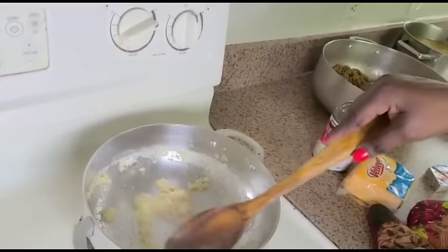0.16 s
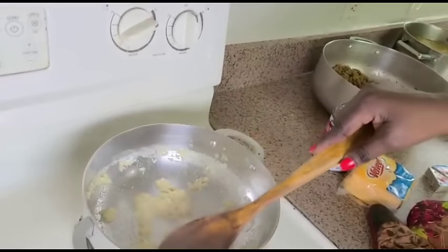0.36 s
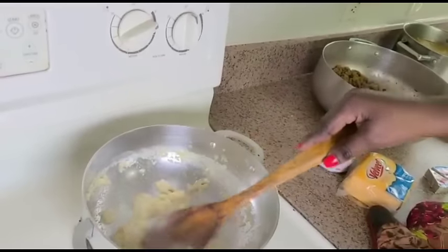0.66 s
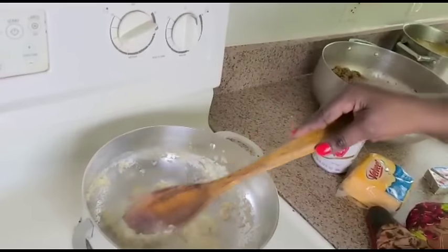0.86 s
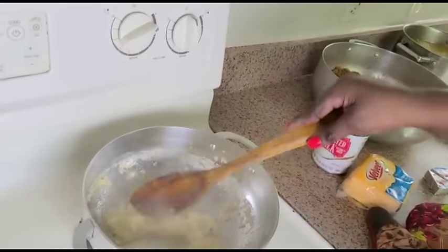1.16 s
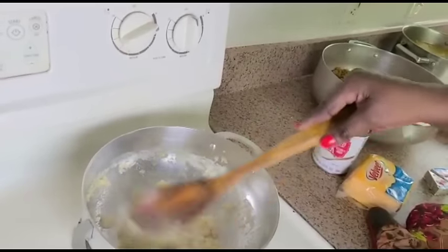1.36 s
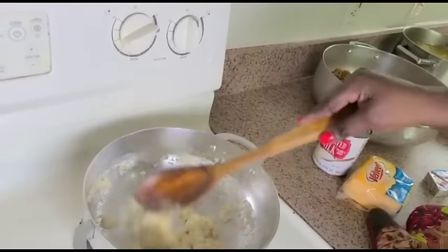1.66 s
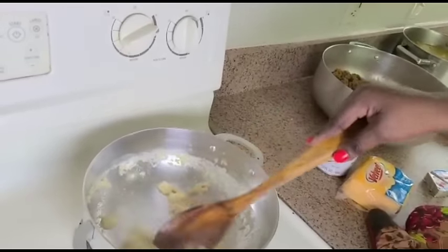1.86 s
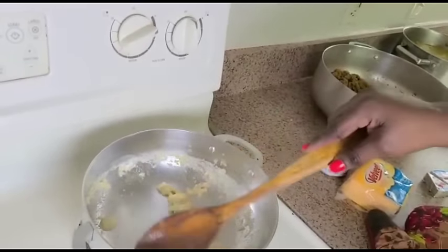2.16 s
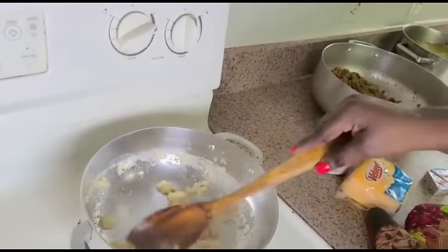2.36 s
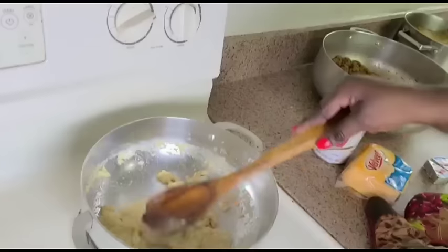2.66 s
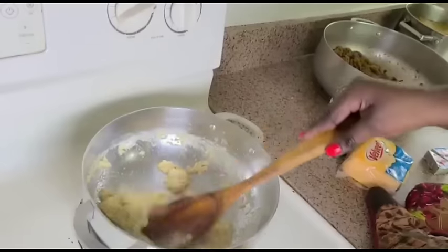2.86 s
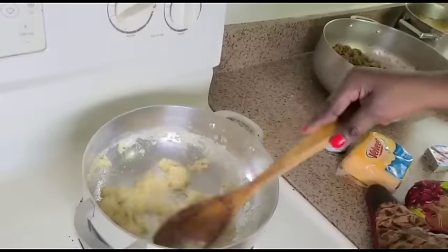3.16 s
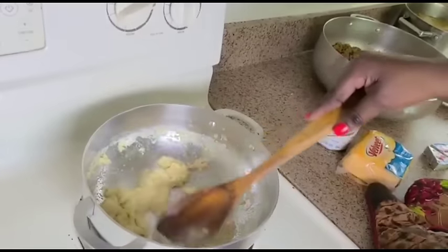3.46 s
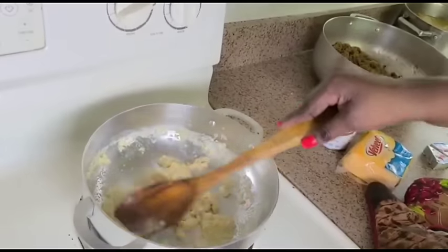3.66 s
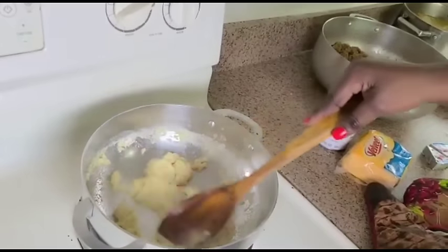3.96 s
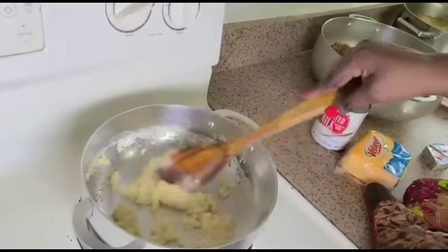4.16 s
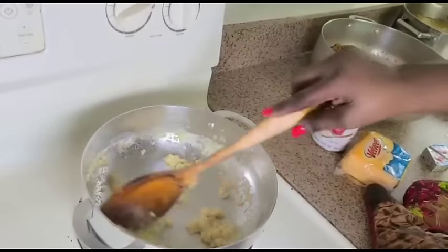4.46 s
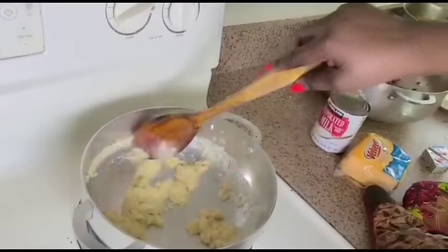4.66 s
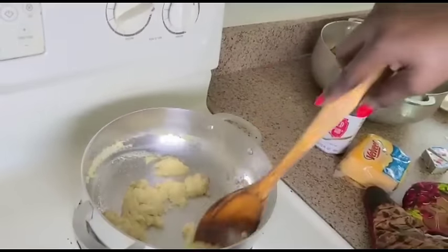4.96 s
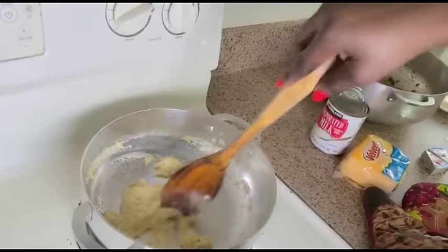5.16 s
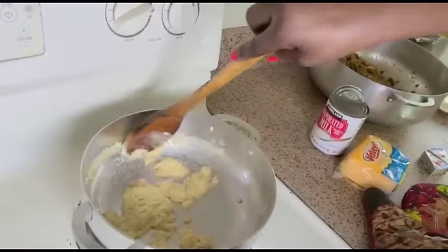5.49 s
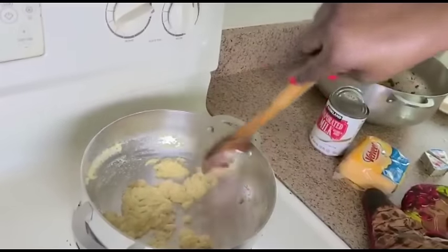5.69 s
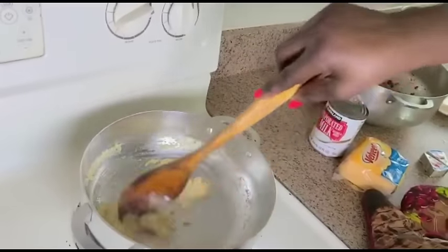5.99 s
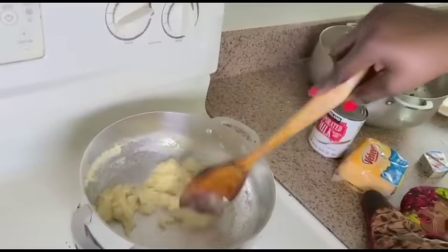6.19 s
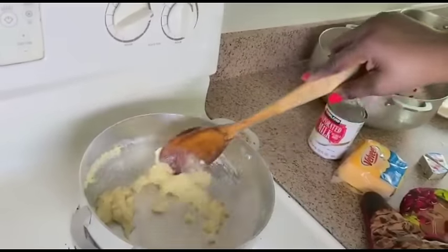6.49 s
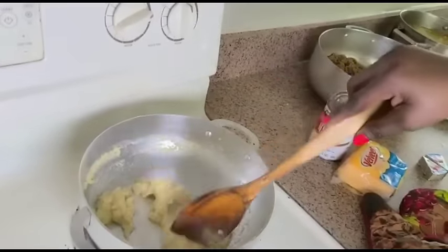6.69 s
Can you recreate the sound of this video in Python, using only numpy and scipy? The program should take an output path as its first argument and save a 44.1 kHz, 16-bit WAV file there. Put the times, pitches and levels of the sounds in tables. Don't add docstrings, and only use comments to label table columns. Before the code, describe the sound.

A wooden spoon knocks and scrapes unevenly around a thin metal pot while fat sizzles softly and a low appliance hum rumbles underneath.

```python
import sys
import numpy as np
from scipy import signal
from scipy.fft import rfft, irfft, next_fast_len
from scipy.io import wavfile

SR = 44100
rng = np.random.default_rng(int(sys.argv[2]) if len(sys.argv) > 2 else 0)


def unload_wav(signal):
    wavfile.write(
        sys.argv[1],
        SR,
        np.round(np.clip(np.atleast_2d(signal).T, -1, 1) * 32767).astype(np.int16),
    )


def natural_amplitude(level_db):
    exponent = np.asarray(level_db, float) / 20
    return 10 ** exponent


N = 301203
PADDED = next_fast_len(N)


def scene():
    struck = bottom_blows() + wall_blows() + corner_blows() + burner_jolts()
    return struck + natural_amplitude(-21) * kitchen(struck) + dragging() + frying() + rumble()


# mode_hz, level_db, t60_s
STOVE_MODES = [(95, -9, 0.085), (164, -7.5, 0.067), (204, -6.5, 0.048), (259, -15, 0.018), (328, -14, 0.03)]


def knocks(hits, modes, scatter_db, level_db, cloud_db, cloud_t60, skid_db, rise_s, dull_db, tap_db):
    t = np.arange(12288) / SR
    hz, mode_db, t60 = np.transpose(modes + STOVE_MODES)
    is_stove = np.arange(len(hz)) >= len(modes)
    ringing = natural_amplitude(-60 * np.outer(1 / t60, t)) * np.exp(2j * np.pi * np.outer(hz, t))
    out = np.zeros((2, N + 2 * len(t)))
    for s, peak_db, bright_db, edge_db, thump_db, chatter_s in hits:
        level_luck, lag_luck, phase = rng.standard_normal((3, len(hz)))
        noise = rng.standard_normal((3, len(t)))

        zone_db = np.where(hz > 3200, edge_db, np.where(hz > 1200, bright_db, 0)) + peak_db + level_db
        blow_db = np.where(is_stove, thump_db - 0.5, zone_db)
        strength = natural_amplitude(mode_db + blow_db + scatter_db * level_luck)
        turn = (1 - at_hz(LIKENESS, hz)) * 2.88 * lag_luck
        phasors = np.exp(1j * (phase - np.outer([0, 1], turn)))
        rings = ((strength * sides(hz) * phasors) @ ringing).imag

        colour = [(200, dull_db - 22.5), (420, dull_db), (900, 0.39),
                  (1300, bright_db + 4), (2200, bright_db + 5.5), (3200, bright_db + 2.5),
                  (4500, edge_db + 0.5), (6000, edge_db), (9000, edge_db - 13.5)]
        cloud = irfft(ports(noise[:2], colour)[1], len(t)) * natural_amplitude(-60 * t / cloud_t60)
        response = rings + natural_amplitude(peak_db + cloud_db) * cloud
        response = response * (1 - np.exp(-t / 0.00039))

        chatter = np.exp(-t / max(chatter_s, .0005)) + natural_amplitude(skid_db) * np.exp(-t / 0.051)
        burst = (noise[2] ** 3 * (1 - np.exp(-t / rise_s)) * chatter)[:len(t) // 2]
        burst[0] = natural_amplitude(tap_db) * np.sqrt(np.sum(burst ** 2))
        force = burst / np.sqrt(np.sum(burst ** 2))

        sound = signal.fftconvolve(response, [force], axes=1)
        start = round(s * SR)
        out[:, start:start + sound.shape[1]] += sound
    return out[:, :N]


# mode_hz, level_db, t60_s
BOTTOM_MODES = [(384.6, -12.5, 0.15), (452, -6.5, 0.13), (501.7, -2, 0.16), (650, -7, 0.033),
                (761, 3.5, 0.033), (877.5, -13.5, 0.29), (1116, -5, 0.037), (1145, -4, 0.065),
                (1252, 9, 0.05), (1482, -2, 0.12), (1750, 16, 0.026), (1922, 20, 0.023), (2092, 10, 0.084),
                (2180, 6, 0.095), (2440, 1, 0.031), (2585, -6, 0.07), (2893, 10.5, 0.043), (4540, 12, .03)]
# start_s, peak_db, brightness_db, chatter_s
LANDINGS = [(0.086, -1, -17, 0.012), (0.258, -45, 13, 0.008), (0.677, -8.5, -11.5, 0.037),
            (0.95, -4, -15.5, 0.014), (0.994, -10, -5.5, 0.0092), (1.089, -27.5, -4, 0.008),
            (1.211, -10, -15, 0.0034), (1.386, -19.5, -3, 0.0051), (1.503, -3.5, -14.5, 0.0075),
            (1.774, -9, -7.5, 0.0075), (1.786, -4, -11.5, 0.018), (2.052, -2.5, -8.5, 0.008),
            (2.104, -12, -9.5, 0.031), (2.349, -12.5, -14.5, 0.0031), (2.627, -8, -8, 0.0045),
            (2.713, -21, -15, 0.019), (2.902, -11, -9, 0.0093), (2.917, -12, -7, 0.021),
            (3.119, -9, -21, 0.0083), (3.23, -20, -5.5, 0.0031), (3.349, -11, -6.5, 0.0028),
            (3.499, -17, -11, 0.0038), (3.682, -8.5, -9.5, 0.048), (3.809, -25, -1, 0.008),
            (4.17, -12, -13, 0.0073), (4.574, -37, -38, 0.0064), (4.855, -17, -10, 0.026),
            (6.001, -11, -16, 0.012), (6.619, -14, -18, 0.023)]
# start_s, peak_db, brightness_db
BOUNCES = [(0.091, -4, -16.5), (0.115, -13, -20), (0.713, -10.5, -13.5), (0.967, -5, -9.5),
           (1.006, -7.5, -14), (1.112, -37, -7), (1.238, -12, -13.5), (1.257, -13.5, -28), (1.512, -5, -26),
           (1.541, -10.5, -13), (2.056, -4.5, -35), (2.079, -29, 3), (2.644, -10, -9.5),
           (2.679, -12.5, -21), (2.732, -20, -17), (2.944, -9, -11.5), (2.959, -29, -27.5),
           (3.379, -18.5, -12), (3.419, -15, -24), (3.719, -11, -11.5), (4.189, -22, -5), (6.029, -14, -29),
           (6.051, -16, -7), (6.079, -32, -17)]


def bottom_blows():
    bounce_chatter_s = 0.018
    rows = sorted(LANDINGS + [row + (bounce_chatter_s,) for row in BOUNCES])
    hits = []
    for s, db, bright_db, chatter_s in rows:
        edge_db, thump_db = -7.5 + 0.62 * bright_db, -12.5 + 0.72 * db
        hits.append((s, db, bright_db, edge_db, thump_db, chatter_s))
    return knocks(hits, BOTTOM_MODES, scatter_db=3.0, level_db=-13.5, cloud_db=4.0, cloud_t60=0.062,
                  skid_db=-11.5, rise_s=0.0031, dull_db=2.0, tap_db=-7)


# mode_hz, level_db, t60_s
WALL_MODES = [(453.2, 3.5, 0.36), (497, -8, 0.2), (810, -14, 0.2), (834, 5.5, 0.24), (1183, 7, 0.087),
              (1294, 1, 0.24), (1350, -7, .25), (1590, 5, 0.27), (1860, -3, 0.2), (1940, 6, 0.081),
              (2070, 8, 0.14), (2237, 10, .09), (2550, 4, 0.063), (2840, 6, 0.087), (2990, 3, 0.043),
              (3430, 9, 0.025), (4680, -8.5, 0.053), (5180, -16, 0.041), (6000, -11, 0.038),
              (6820, 10, 0.054)]
# start_s, peak_db, brightness_db, edge_db, chatter_s
WALL_HITS = [
    (5.329, -5, 0.5, 0, 0.0067),
    (5.382, -5.5, 0, -9, 0.0074),
    (5.76, -11.5, -7, -10, 0.006),
    (5.774, -13.5, -4, -9, 0.0013),
]


def wall_blows():
    return knocks(rim_hits(WALL_HITS, thump_db=-16.5), WALL_MODES, scatter_db=-4.0, level_db=-16.0, cloud_db=9,
                  cloud_t60=0.018, skid_db=-12, rise_s=0.0024, dull_db=-2.5, tap_db=-7.5)


# mode_hz, level_db, t60_s
CORNER_MODES = [(860, -4.5, 0.029), (1232, 5.5, 0.11), (1390, -4, 0.024), (1934, 7.5, 0.039),
                (2160, 13, 0.046), (2340, 5, 0.041), (3020, 7, 0.028), (3270, -19, 0.07), (4440, -3, 0.027),
                (5840, -9, 0.037)]
# start_s, peak_db, brightness_db, edge_db, chatter_s
CORNER_HITS = [
    (4.91, -11.5, -6, 0, 0.0039),
    (4.918, -6, -2, -20, 0.0017),
    (6.671, -1, -8.5, -5, 0.0045),
    (6.686, -4, -26, -13.5, 0.0014),
]


def corner_blows():
    return knocks(rim_hits(CORNER_HITS, thump_db=-29), CORNER_MODES, scatter_db=4.5, level_db=-12.0, cloud_db=-1.5,
                  cloud_t60=0.071, skid_db=-24, rise_s=0.0026, dull_db=-12, tap_db=4.0)


def rim_hits(rows, thump_db):
    return [row[:-1] + (thump_db, row[-1]) for row in rows]


# start_s, thump_db
JOLTS = [
    (2.626, -1.5),
    (2.679, -5.5),
    (2.732, -27),
    (3.72, -22),
]


def burner_jolts():
    hits = [(s, -30, -20, -20, thump_db, 0.0039) for s, thump_db in JOLTS]
    return knocks(hits, BOTTOM_MODES, scatter_db=1.0, level_db=-17, cloud_db=3.5, cloud_t60=0.06,
                  skid_db=-21, rise_s=0.0021, dull_db=3, tap_db=2)


# start_s, spoon_speed_db, spoon_weight_db
STIR = [(0.0, -28.5, -41), (0.6, -32, -44), (0.98, -30, -45), (1.3, -33, -47), (1.63, -28, -31),
        (1.85, -31.5, -49), (2.15, -34, -40), (2.4, -36, -40), (2.6, -29.5, -36), (2.71, -35, -38),
        (2.84, -32.5, -45), (3.3, -30.5, -34.5), (3.43, -28, -34.5), (4.6, -34.5, -39.5), (5.4, -34.5, -38),
        (5.59, -30.5, -52), (5.81, -38, -27.5), (6.3, -31.5, -46.5)]


def dragging():
    speed_db, weight_db = in_time(STIR)
    scrape = natural_amplitude(speed_db - 2.5) * rub(1200, 3200, per_s=2500, damping=0.38)
    press_db = weight_db - 5 + 3.5 * shake()
    return scrape + natural_amplitude(press_db) * rub(300, 1200, per_s=1300, damping=0.39)


def rub(low_hz, high_hz, per_s, damping):
    slips = grains(per_s, 1.7, (2, N)) * natural_amplitude(2 * drift(7.4))
    out = np.zeros((2, PADDED))
    modes = [mode for mode in BOTTOM_MODES if low_hz < mode[0] < high_hz]
    for k, (hz, level_db, t60) in enumerate(modes):
        r, w = natural_amplitude(-60 / (t60 * damping * SR)), 2 * np.pi * hz / SR
        rung = signal.lfilter([0, np.sin(w)], [1, -2 * r * np.cos(w), r * r], slips)
        out[:, :N] += natural_amplitude(level_db + 2.0 * drift(3.1)) * rung * (-1) ** k
    _, heard = ports(out, [(100, 0), (10000, 0)])
    return rms_one(irfft(heard, PADDED)[:, :N])


def shake():
    s, db = np.transpose(LANDINGS)[:2]
    coarse = np.arange(0, N, 64)
    since = np.maximum(coarse / SR - s[:, None], 0) / 0.078
    swell = natural_amplitude(db / 2) @ (since * np.exp(1 - since))
    return np.interp(np.arange(N), coarse, swell)


# band_hz, density_db
FRY_SPECTRUM = [(700, -20), (1050, -18.5), (1400, -12), (2000, -6.5), (2500, -6), (3200, -4), (4600, -2),
                (5800, -3.5), (7200, -5.5), (8500, -1.5), (10900, -1.5), (12300, -3.5), (13500, -10.5),
                (15600, -13)]
# start_s, level_db
SIZZLE = [(0.0, -27.5), (0.68, -30.5), (0.9, -31), (1.3, -29.5), (1.76, -26), (1.81, -29), (2.45, -32.5),
          (2.7, -33.5), (2.85, -29), (3.1, -30.5), (3.45, -26.5), (3.9, -26.5), (4.38, -27), (4.79, -25.5),
          (5.5, -27), (6.1, -30), (6.3, -22), (6.83, -25)]


def frying():
    (fry_db,) = in_time(SIZZLE)
    bursts = grains(14000, 2.7, (2, PADDED))
    return natural_amplitude(fry_db + 5.0) * banded(FRY_SPECTRUM, bursts, patchy_db=1.07, flicker_hz=4.0)


def rumble():
    return natural_amplitude(-28 + 1 * shake()) * appliance()


# band_hz, density_db
RUMBLE_SPECTRUM = [(13, -54), (22, -24), (27, -58), (43, -11), (69, 2.5), (99, -2.5), (171, -19),
                   (349, -16), (421, -18.5), (491, -30), (556, -26), (735, -26), (900, -34), (1170, -60),
                   (1980, -120)]


def appliance():
    hum_hz, width_hz = 63.4, 11.2
    hz, flat = ports(rng.standard_normal((2, PADDED)), [(10, 0), (1000, 0)])
    resonance = 1 / (1 + 1j * (hz - hum_hz ** 2 / hz) / width_hz)
    boom = irfft(flat * resonance, PADDED)[:, :N]
    noise = rng.standard_normal((2, PADDED))
    broad = banded(RUMBLE_SPECTRUM[:-1], noise, patchy_db=1.0, flicker_hz=1.8)
    return rms_one(broad + rms_one(boom))


def kitchen(x):
    t60_s, wall_cut_hz = 0.35, 14000
    size = next_fast_len(N + SR)
    hz = np.arange(size // 2 + 1) * SR / size
    dull = 1 / (1 + 1j * hz / wall_cut_hz)
    spectrum = rfft(x.mean(axis=0), size)
    echoes = [0, 0]
    for k, lag_s in enumerate(rng.uniform(.008, .035, 16)):
        loop = natural_amplitude(-60 * lag_s / t60_s) * dull * np.exp(-2j * np.pi * hz * lag_s)
        echoes[k % 2] = echoes[k % 2] + loop / (1 - loop) * (-1) ** (k // 2)
    return irfft(spectrum * np.array(echoes), size)[:, :N]


def banded(spectrum, source, patchy_db, flicker_hz):
    hz, coloured = ports(source, [(spectrum[0][0] / 2, -90)] + spectrum)
    lowest, highest = np.log2(spectrum[0][0]), np.log2(min(spectrum[-1][0], SR / 2))
    out, together = 0, drift(flicker_hz)
    for centre in np.arange(lowest, highest + .5, .5):
        window = np.cos(np.pi * np.clip(np.log2(hz) - centre, -.5, .5)) ** 2
        band = irfft(coloured * window, source.shape[1])[:, :N]
        out = out + natural_amplitude(patchy_db * (1.2 * together + drift(5.7))) * band
    return rms_one(out)


def grains(per_s, spread_db, shape):
    sizes = natural_amplitude(spread_db * np.minimum(rng.exponential(1, shape), 4)) * rng.choice([-1, 1], shape)
    return sizes * (rng.random(shape) < per_s / SR) + 1e-18


def drift(rate):
    r = np.exp(-80 * np.pi * rate / SR)
    slow = signal.lfilter([1], [1, -2 * r, r * r], rng.standard_normal(N // 40 + 2002))[2000:]
    return np.interp(np.arange(N) / 40, np.arange(len(slow)), rms_one(slow))


def in_time(rows):
    s, *columns = np.transpose(rows)
    return [np.interp(np.arange(N) / SR, s, c) for c in columns]


def at_hz(points, hz):
    table = np.array(points)
    return np.interp(np.log(hz), np.log(table[:, 0]), table[:, 1])


def rms_one(x):
    return x / np.sqrt(np.mean(x ** 2) + 1e-20)


# band_hz, likeness (0 to 1)
LIKENESS = [(30, .99), (60, .97), (250, .9), (600, .78), (1000, .45), (2000, .4), (4000, .25), (12000, .1)]


def ports(pair, spectrum):
    mid, side = rfft(pair)
    hz = np.maximum(np.arange(len(mid)) * SR / pair.shape[1], 1)
    alike = at_hz(LIKENESS, hz)
    lag_s = .00018 * np.clip(hz / 3000, 0, 1)
    late = np.exp(-2j * np.pi * hz * lag_s)
    both = np.sqrt(1 + alike) * mid + np.sqrt(1 - alike) * side * [[1], [-1]]
    return hz, both * [np.ones(len(hz)), late] * sides(hz) * natural_amplitude(at_hz(spectrum, hz))


# band_hz, left_minus_right_db
SHADE = [(80, 4), (125, 2.5), (250, -1.5), (900, -1.5), (1500, -4), (2400, -9.5), (3200, -7), (4600, -10),
         (6000, -4), (7200, -1), (9000, -2.5), (11000, -5), (13000, -0.5)]


def sides(hz):
    shade_db = at_hz(SHADE, hz) * (np.asarray(hz) > 90)
    return natural_amplitude(np.multiply.outer([.5, -.5], shade_db))


# start_s, step_db
DUCKS = [
    (0.0, -4.5),
    (4.925, -2),
    (5.334, -10.5),
]


def gain_control():
    attack_s, recover_s = .008, 1.6
    s, db = np.transpose(DUCKS)
    since = np.maximum(np.arange(N) / SR - s[:, None], 0)
    return db @ (np.exp(-since / recover_s) * np.minimum(since / attack_s, 1))


def band_limit(x):
    return signal.sosfilt(signal.butter(12, 15780, fs=SR, output="sos"), x)


def record(dry):
    hiss_band = signal.butter(4, 12000, "high", fs=SR, output="sos")
    hiss = signal.sosfilt(hiss_band, rng.standard_normal(dry.shape))
    rounded = 1.428 * np.tanh(natural_amplitude(gain_control()) * dry / 1.175)
    top_cut = signal.ellip(8, .5, 60, 15200, fs=SR, output="sos")
    mix = signal.sosfilt(top_cut, rounded + natural_amplitude(-43) * hiss)
    return band_limit(mix)


dry = scene()
out = record(dry)
unload_wav(out)
```